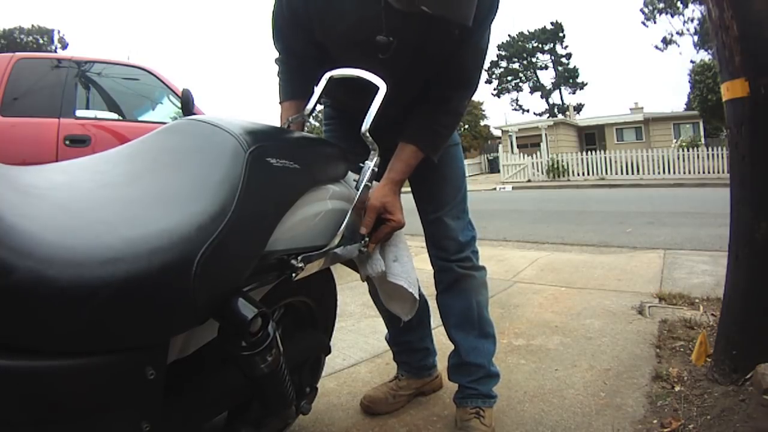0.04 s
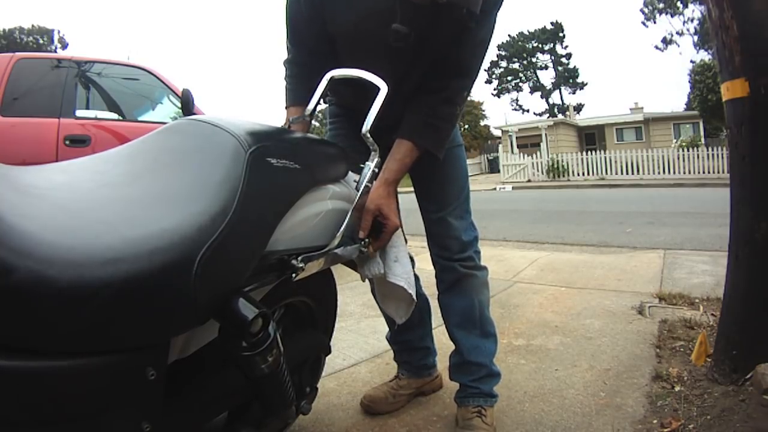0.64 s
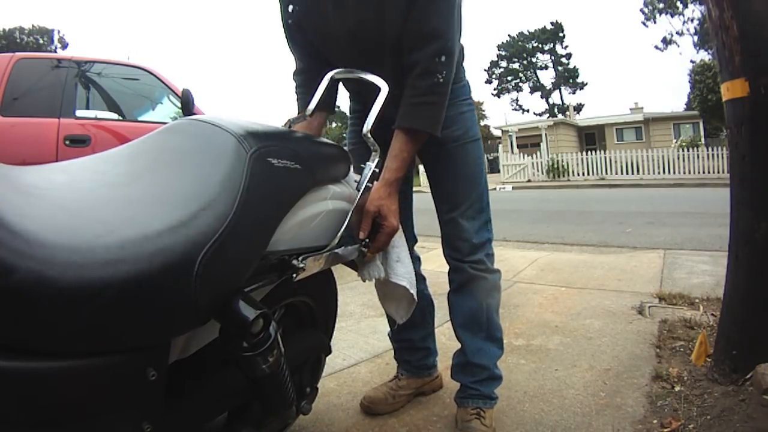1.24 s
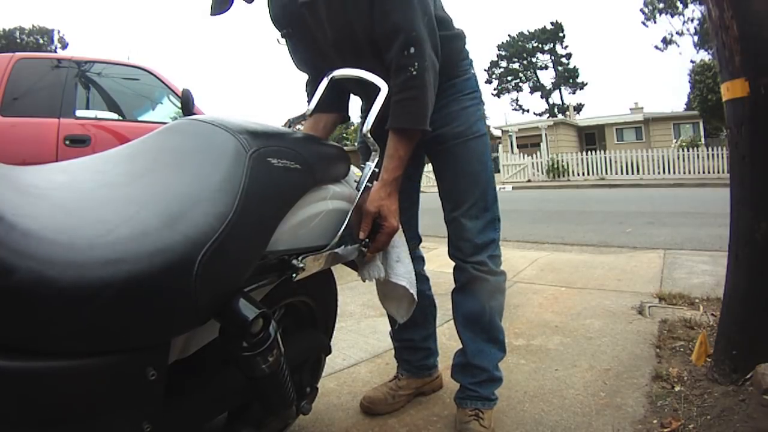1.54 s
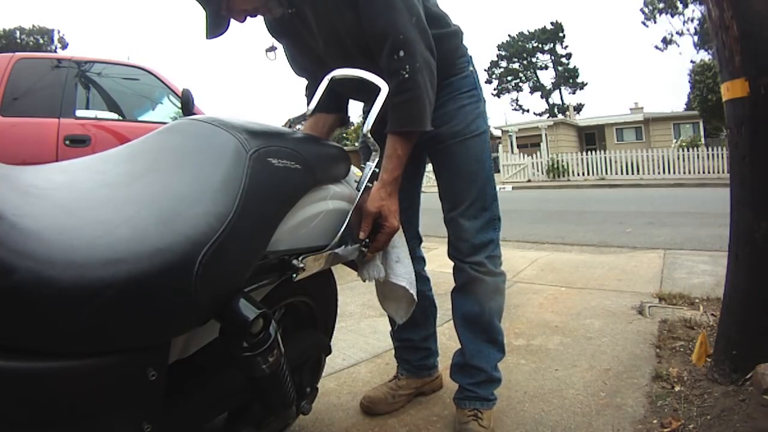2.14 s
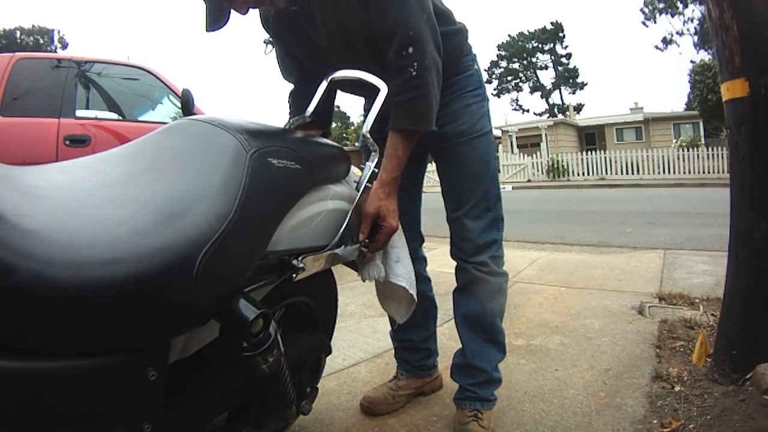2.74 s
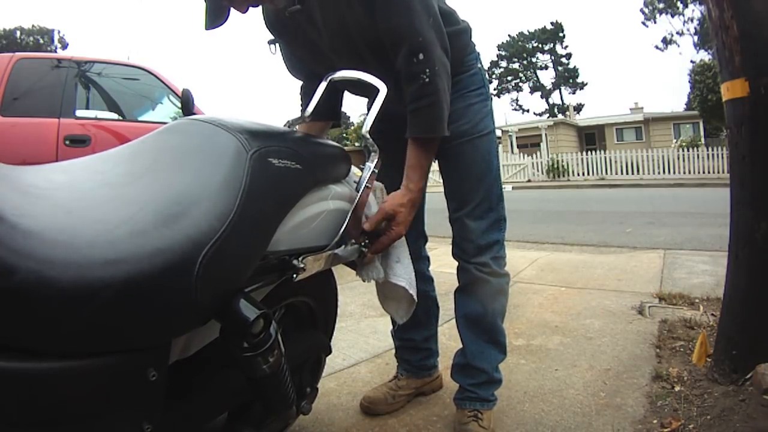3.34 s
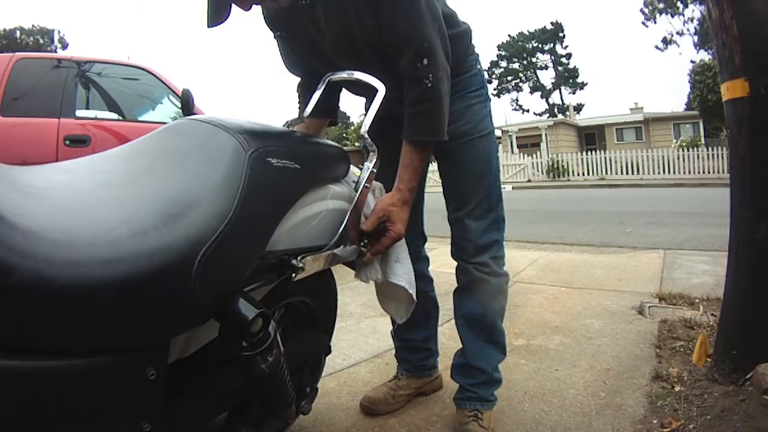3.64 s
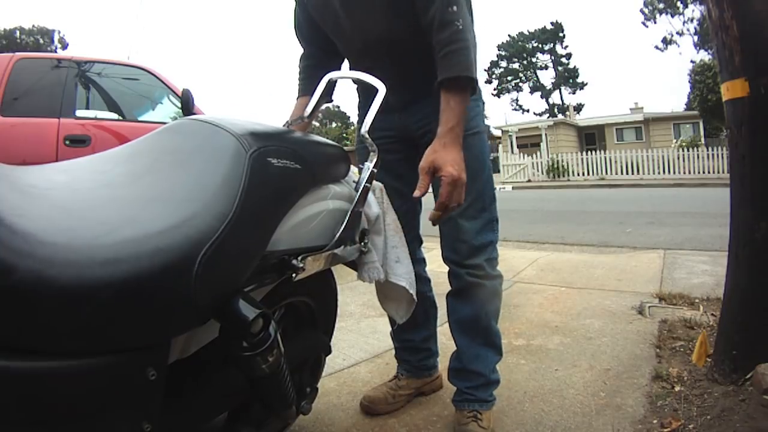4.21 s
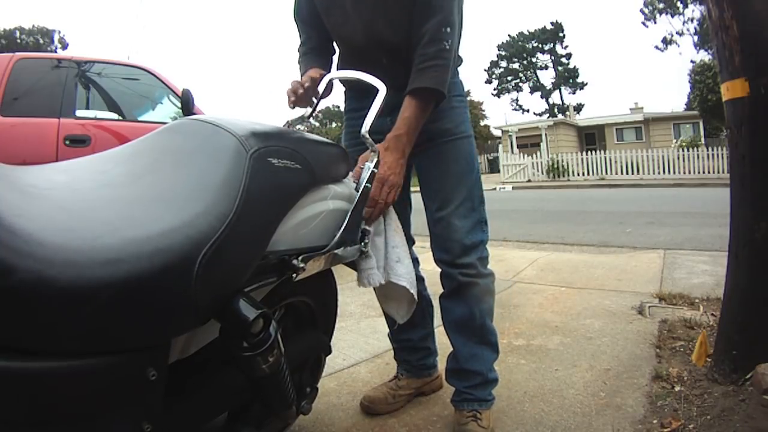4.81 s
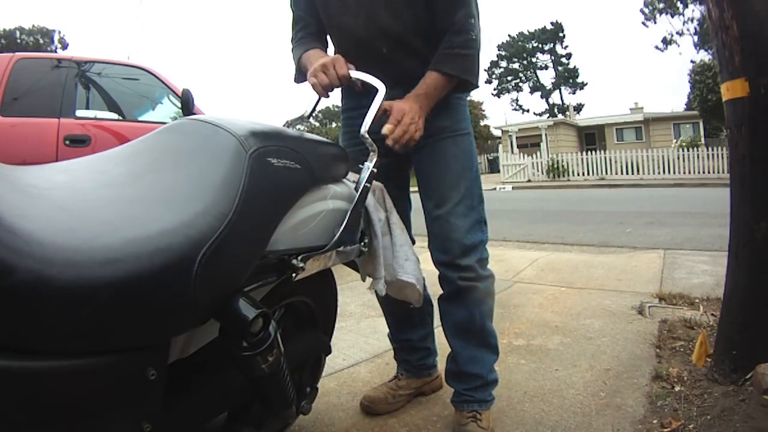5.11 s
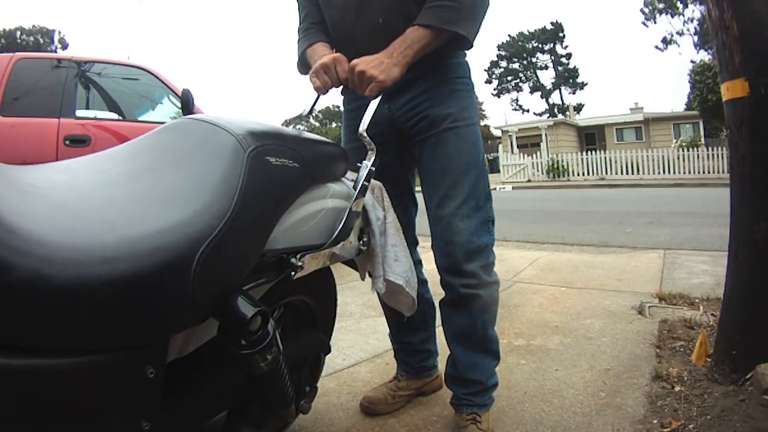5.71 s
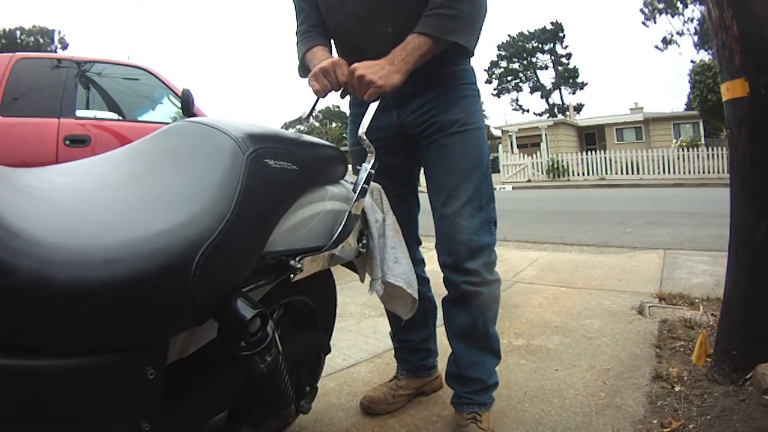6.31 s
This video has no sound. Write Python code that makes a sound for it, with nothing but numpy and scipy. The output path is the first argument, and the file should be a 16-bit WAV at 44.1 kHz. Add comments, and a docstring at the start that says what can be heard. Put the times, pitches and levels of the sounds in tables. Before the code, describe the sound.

A steel luggage rack scrapes briefly along its posts on a motorcycle right at the start, close to the microphone, ending in a small catch. Very faint ticks and clinks follow, with a light latch click at about 2.2 seconds. At 2.8 seconds the rack slams home with a loud clank and a quick rebound, its tube frame ringing briefly. The overall level dips slightly for about three seconds afterwards. At 3.7 seconds the latch snaps shut with a sharp, bright double click, followed by a soft knock at 4.1. From 5.5 to 6.4 seconds the rack is rocked back and forth, making a quick rattle of metal knocks and small chinks, strongest around 6 seconds. Nearby walls give the contacts a short echo. Underneath, throughout, lies a quiet street with soft hiss and the faint low swell of far traffic.

```python
"""Close to the microphone, the arms of a steel luggage rack scrape along a motorcycle's posts.
The rack knocks and slams home, the latch snaps shut, then the rack is rocked to test it.
Every contact rings the same tube frame, and small parts chink. Nearby walls echo; behind them lies
a quiet street with far traffic. The first overload turns the recorder down for about three seconds."""
import sys
import numpy as np
from scipy import signal
from scipy.fft import next_fast_len
from scipy.io import wavfile
from scipy.ndimage import uniform_filter1d

SR = 44100
rng = np.random.default_rng(int(sys.argv[2]) if len(sys.argv) > 2 else 0)


def digitize_waveform(pressure):
    """Quantize a signal to 16-bit integers and store it at the path in sys.argv[1].

    Rows of a 2-D input are taken as channels; values are limited to [-1, 1].
    """
    field = np.atleast_2d(pressure).T
    bounded = np.clip(field, -1, 1)
    quanta = np.round(bounded * 32767).astype(np.int16)
    wavfile.write(sys.argv[1], SR, quanta)


N = 289251

# distant street and microphone hiss: f/Hz, density/dB
STREET_SPECTRUM = [(15, -43.5), (25, -19.5), (91, -1.5), (246, -7.5), (378, -7), (552, -9.5), (614, -8),
                   (997, -10), (1110, -11.5), (1200, -13.5), (1410, -14), (2120, -17.5), (7500, -26),
                   (14300, -28.5), (15500, -29.5)]
# far vehicles: loudest at t/s, level/dB, f/Hz, time to half amplitude/s
VEHICLES = [(.2, -74, 91, .9), (2.6, -65, 88.9, 0.33), (4.1, -61, 102, .3), (6.3, -74.5, 97.6, 0.65)]
# echo of the nearby walls: f/Hz, t60/s
WALL_T60 = [(100, .55), (450, 1), (1000, 0.5), (2000, .45), (6000, 0.29), (12000, .22)]
# faint clinks of small parts as the rack is handled: t/s, level/dB, f/Hz
CLINKS = [(.675, -64, 1430), (1.486, -61.5, 1320), (1.858, -59.5, 1130), (2.042, -60.5, 1420),
          (5.59, -47, 1520), (6.425, -62.5, 6350)]
# modes of the latch plate, shaken at each stop: f/Hz, level/dB
PLATE_MODES = [(5100, -3), (5850, -6), (6550, -5)]
# clear modes of the tube frame: f/Hz, t60/s, knocked/dB, latched/dB, rocked or sliding/dB
FRAME_MODES = [(264, 0.79, -27.5, -34, -31.5), (312, 0.54, -26.5, -28, -32), (331.9, 0.4, -22.5, -22, -23),
               (405.4, 0.3, -26.5, -28.5, -26.5), (443, 0.14, -23, -23.5, -22.5),
               (474.6, 0.29, -24.5, -23, -19.5), (605, 0.12, -29, -22, -22.5),
               (675.5, 0.16, -23.5, -28, -19.5), (784, 0.078, -29, -23.5, -19),
               (821, 0.71, -30.5, -34, -31.5), (947, 0.22, -30.5, -26.5, -19),
               (972, 0.38, -25.5, -21, -22.5), (1045, 0.075, -17, -29, -24), (1076, 0.19, -25, -28, -29),
               (1134.4, 0.18, -34, -30.5, -32), (1242, .19, -25.5, -25, -26), (1333, 0.12, -23.5, -26, -24),
               (1386, .16, -28, -28, -44), (1467, 0.13, -26.5, -34.5, -20.5), (1520, 0.23, -22, -23.5, -27),
               (1630, .18, -24.5, -26.5, -32), (1688, 0.28, -30.5, -28.5, -31),
               (1750, 0.4, -38, -28.5, -30), (1803, 0.078, -29, -30, -34), (1940, 0.18, -25, -21, -22.5),
               (2125, .2, -26.5, -23, -23.5), (2234, 0.14, -23, -22, -22), (2445, 0.12, -25.5, -17.5, -36),
               (2570, 0.1602, -26.5, -26.5, -24), (2944, 0.16, -25, -29, -24),
               (3141, 0.086, -28.5, -25.5, -19), (5078, .08, -24.5, -27.5, -26),
               (7100, 0.078, -22.5, -14, -26)]
KNOCKED, LATCHED, RUBBED = 2, 3, 4  # its level columns
# crowded, damped modes of rack and bike: f/Hz, t60/s
CLATTER_T60 = [(100, 0.061), (400, 0.098), (1200, 0.12), (2400, .1), (4000, 0.057), (7000, .05),
               (14000, 0.037)]
# colour of each kind of contact at the microphone: f/Hz, gain/dB
SLIDE_COLOUR = [(70, -42), (200, -21.5), (310, -7), (460, -2), (560, -14.5), (700, -9), (1000, -11),
                (1500, -13), (1900, -18.5), (2300, -14.5), (3500, -23), (6000, -32), (9500, -48.5),
                (15500, -64)]
KNOCK_COLOUR = [(40, -40), (90, -27.5), (150, -25.5), (240, -20.5), (330, -9), (450, -4), (580, -10.5),
                (820, -8), (1050, -3.5), (1550, -10), (2300, -13), (3000, -20), (6500, -30), (15500, -62)]
LATCH_COLOUR = [(70, -40), (200, -33.5), (330, -19.5), (440, -8), (550, -14), (780, -11), (1300, -5),
                (2000, -5.5), (2900, -11.5), (5000, -15), (7000, -18.5), (10500, -27.5), (12000, -41.5),
                (15500, -51.5)]
ROCK_COLOUR = [(70, -39), (180, -17), (300, -10), (450, -3.5), (600, -11), (950, -5.5), (1400, -2),
               (2000, -10), (3000, -16.5), (4400, -22.5), (6400, -26.5), (7800, -37), (11000, -49.5),
               (15500, -69)]
# the arms scraping along the posts: t/s, slip level/dB, treble/dB
SCRAPE_CURVE = [(0, -49.5, 2.5), (0.057, -50.5, -26), (.09, -58, -6), (0.107, -39.5, 14), (.145, -43, -9)]
# the arms catching as they slide: t/s, level/dB, bass/dB, treble/dB
SNAGS = [(.021, -46, -5, -1), (.097, -35.5, 4.5, -19), (.111, -35, 5, 3.5), (.130, -27.5, -4, 2.5)]
# single knocks and rebounds on the posts: t/s, level/dB, bass/dB, treble/dB
KNOCKS = [(0.454, -59, 10, -16), (1.108, -51.5, 10, -37), (2.882, -37.5, -4.5, 5.5), (2.903, -26, 1.5, -4),
          (2.938, -43.5, 10, -3), (4.105, -43, 2.5, -14), (5.232, -57.5, 14.5, 5)]
# the latch ticking and snapping shut: t/s, level/dB, bass/dB, treble/dB
LATCH_SNAPS = [(1.42, -59, 8.5, -17), (2.172, -37, 2, -9), (3.36, -62, -4.5, -19.5), (3.637, -39, 7.5, -16),
               (3.660, -39.5, -7.5, -9.5), (3.681, -17, -5.5, 7.5), (3.704, -16.5, -2, -5)]
# the latched rack tapping loosely in its play: t/s, level/dB, bass/dB, chink/dB
TAPS = [(5.483, -38, -6, -49.5), (5.490, -36.5, 10, -67), (5.541, -37, 0, -45), (5.702, -35.5, 3.5, -62)]
# pushes on the front stop: t/s, level/dB, bass/dB, treble/dB, chink/dB, pin tick's lead/s, tick/dB
PUSHES = [(5.662, -31, 1, -9, -36.5, 0.016, -53), (5.889, -23, -1.5, 3, -36, 0.011, -43.5),
          (6.107, -23, -3.5, 2.5, -33.5, 0.011, -42.5), (6.357, -31, -2, 0.5, -45.5, 0.021, -43.5)]
# pulls back through the play: t/s, level/dB, drag/s, chink/dB
PULLS = [(5.753, -33, .023, -48), (5.968, -32, .020, -47.5), (6.185, -35.5, .023, -45)]


def amp(db):
    """Decibels to gain."""
    return 10 ** (np.asarray(db) / 20)


def unit_rms(x):
    """Scales to rms 1."""
    return x / np.sqrt(np.mean(x ** 2) + 1e-20)


def curve_at(points, hz):
    """Reads a table along a logarithmic frequency axis."""
    f, value = np.transpose(points)
    return np.interp(np.log(hz + 1), np.log(f + 1), value)


def add(mix, s, sound):
    """Mixes a sound in at time s."""
    part = mix[max(round(s * SR), 0):][:len(sound)]
    part += sound[:len(part)]


def coloured(x, points):
    """Filters by a curve of f/Hz, gain/dB, with minimum phase so that attacks stay sharp."""
    size = next_fast_len(len(x) + SR // 10)
    log_gain = np.log(amp(curve_at(points, abs(np.fft.fftfreq(size, 1 / SR)))))
    response = np.exp(np.conj(signal.hilbert(log_gain)))
    return np.fft.ifft(np.fft.fft(x, size) * response).real[:len(x)]


def dying_noise(t60s, size):
    """Noise whose bands hold equal energy and die at their own speeds; total energy 1."""
    hz, t, bands = signal.stft(rng.standard_normal(size), SR, nperseg=128)
    t60 = curve_at(t60s, hz)[:, None]
    fading = bands * np.exp(-np.log(1000) * t / t60) / np.sqrt(t60)
    tail = signal.istft(fading, SR)[1][:size]
    return tail / np.linalg.norm(tail)


def street(level_db=-61, waver_db=0.67, split_hz=2000):
    """Steady microphone hiss above the distant wash of the street, which wavers slightly."""
    noise = amp(level_db) * unit_rms(coloured(rng.standard_normal(N), STREET_SPECTRUM))
    wash = signal.sosfiltfilt(signal.butter(2, split_hz, fs=SR, output="sos"), noise)
    drift = unit_rms(uniform_filter1d(uniform_filter1d(rng.standard_normal(N), SR // 10), SR // 20))
    return noise + wash * (amp(waver_db * drift) - 1)


def far_traffic(wobble_hz=7):
    """Each vehicle, far off, is a low, unsteady drone that swells and fades."""
    out, t = np.zeros(N), np.arange(N) / SR
    slow = signal.butter(2, wobble_hz, fs=SR, output="sos")
    for s, level_db, hz, half_s in VEHICLES:
        wobble = signal.sosfilt(slow, rng.standard_normal((2, N)))
        phase = 2 * np.pi * hz * t
        drone = unit_rms(wobble[0] * np.cos(phase) + wobble[1] * np.sin(phase))
        swell = 1 / (1 + ((t - s) / half_s) ** 2)
        out += amp(level_db) * swell * drone
    return out


def wall_echo(direct, delay_s=0.017, build_s=.012):
    """Nearby walls return a diffuse echo that reaches the microphone just after the direct sound."""
    t = np.arange(SR) / SR
    build = 1 - np.exp(-np.maximum(t - delay_s, 0) / build_s)
    tail = dying_noise(WALL_T60, SR) * build
    tail = coloured(tail, [(100, 0.5), (400, -2.5), (2000, -7), (5000, -8), (12000, -11)])
    return signal.fftconvolve(direct, tail)[:N]


def chinks(rows, spread, cycles, tail_db=-20, tail_cycles=70):
    """Each small part rings in a cluster of close modes; the higher its pitch, the sooner it dies."""
    out, t = np.zeros(N), np.arange(SR // 5) / SR
    for s, level_db, hz in rows:
        band = signal.butter(3, [hz / (1 + spread), hz * (1 + spread)], "bandpass", fs=SR, output="sos")
        fade = np.exp(-t * hz / cycles) + amp(tail_db) * np.exp(-t * hz / tail_cycles)
        ring = signal.sosfilt(band, rng.standard_normal(len(t)) * fade)
        add(out, s, amp(level_db) * ring / np.std(ring[:SR // 150]))  # level of the attack
    return out


def frame_ring(column, size, scatter_db=2):
    """The tube frame's clear modes; where it is struck decides how strongly each one rings."""
    modes, t = np.array(FRAME_MODES), np.arange(size) / SR
    hz, t60 = modes[:, :1], modes[:, 1:2]
    rings = np.sin(2 * np.pi * (hz * t + rng.random(hz.shape))) * np.exp(-np.log(1000) * t / t60)
    strength = amp(modes[:, column] + scatter_db * rng.standard_normal(len(modes)))
    return strength @ (rings / np.linalg.norm(rings, axis=1, keepdims=True))


def contacts(rows, colour, column, clatter_db, crack_db, crack_s, ring_db):
    """Steel on steel, close up: each contact is a brief crack, a dense clatter and the frame's ring."""
    out, size = np.zeros(N), SR // 2
    t = np.arange(size) / SR
    for s, level_db, bass_db, treble_db, rise_s in rows:
        crack = rng.standard_normal(size) * np.exp(-t / crack_s)
        crack = amp(crack_db) * crack / np.linalg.norm(crack)
        clatter = amp(clatter_db) * dying_noise(CLATTER_T60, size)
        held_db = np.clip((level_db + 60.5) / 2, -7, 0)  # under a light touch the hands damp the frame
        ring = amp(ring_db + held_db) * frame_ring(column, size)
        attack = 1 - np.exp(-t / max(rise_s, 1 / SR))
        blow = coloured((crack + clatter + ring) * attack, colour)
        blow /= np.std(blow[:SR // 50])  # level of the first 20 ms, ahead of bass and treble
        hardness = [(150, 0.0034), (300, bass_db), (460, bass_db),
                    (800, 0.0025), (2000, 0.0038), (5500, treble_db)]
        add(out, s, amp(level_db) * coloured(blow, hardness))
    return out


def with_rise(rows, firm_rise_s, firm_db=-28.5, doubling_db=16):
    """Gives each contact its attack time: the lighter the touch, the slower it builds."""
    return [(s, level_db, bass_db, treble_db, firm_rise_s * 2 ** ((firm_db - level_db) / doubling_db))
            for s, level_db, bass_db, treble_db in rows]


def scrape(slip_s=.007, jitter=.25, rise_s=0.00057, bass_db=-0.5):
    """Stick and slip: a run of unevenly spaced small contacts, as strong as the arms are pressed."""
    s, level_db, treble_db = np.transpose(SCRAPE_CURVE)
    slips = np.arange(s[0], s[-1], slip_s)
    slips += slip_s * jitter * rng.uniform(-1.014, 1, len(slips))
    return [(t, np.interp(t, s, level_db), bass_db, np.interp(t, s, treble_db), rise_s) for t in slips]


def bounces(s, level_db, bass_db, treble_db, count=3, gap_s=.0095, spread=1.55, loss_db=7):
    """After a push the rack settles in bounces, each later, weaker and duller than the last."""
    return [(s + gap_s * k ** spread, level_db - k * loss_db, bass_db + 4 * k, treble_db - 2 * k)
            for k in range(count)]


def rocking(pin_hz=3540):
    """The latched rack shaken to and fro: returns frame contacts, plate chinks and pin ticks."""
    hits, jolts, ticks = [], [], []  # hits: t/s, level/dB, bass/dB, treble/dB
    for s, level_db, bass_db, chink_db in TAPS:
        hits.append((s, level_db, bass_db, -2.5))
        jolts.append((s, chink_db))
    for s, level_db, bass_db, treble_db, chink_db, lead_s, tick_db in PUSHES:
        hits.append((s - lead_s, tick_db + 2, 1, 2))  # the pin's tick carries into the frame
        hits += bounces(s, level_db, bass_db, treble_db)
        ticks.append((s - lead_s, tick_db, pin_hz))
        jolts.append((s, chink_db))
    for s, level_db, drag_s, chink_db in PULLS:
        hits += [(s, level_db, 0, 0),  # the arms touch,
                 (s + drag_s / 2, level_db - 5, 0, -1),  # drag
                 (s + drag_s, level_db + 0.5, 0, 0)]  # and catch
        jolts.append((s + drag_s, chink_db))
    plate = [(s, chink_db + mode_db, hz) for s, chink_db in jolts for hz, mode_db in PLATE_MODES]
    return hits, plate, ticks


def slam(start_s=2.8, count=5, step_s=.0047, crest_s=.013, crest_db=-16.5, swell_db=11,
         bass_db=1, treble_db=3.5):
    """The rack drops home in a quick volley of contacts that swells and dies away."""
    return [(start_s + t, crest_db - swell_db * (t / crest_s - 1) ** 2, bass_db, treble_db)
            for t in step_s * np.arange(count)]


def scene():
    """One microphone by the motorcycle: the rack in front, walls around it, the street far behind."""
    rocks, plate, ticks = rocking()
    rack = contacts(with_rise(slam() + KNOCKS, firm_rise_s=.0009), KNOCK_COLOUR, KNOCKED,
                    clatter_db=-1.5, crack_db=0.5, crack_s=0.0037, ring_db=-1.5)
    rack += contacts(with_rise(LATCH_SNAPS, firm_rise_s=.0018), LATCH_COLOUR, LATCHED,
                     clatter_db=1.5, crack_db=-5, crack_s=0.0031, ring_db=-1.5)
    rack += contacts(with_rise(rocks, firm_rise_s=0.00093), ROCK_COLOUR, RUBBED,
                     clatter_db=2.5, crack_db=-2, crack_s=0.0024, ring_db=1)
    rack += chinks(plate, spread=.05, cycles=18) + chinks(ticks + CLINKS, spread=.15, cycles=24)
    rack += contacts(with_rise(SNAGS, firm_rise_s=0.00087) + scrape(), SLIDE_COLOUR, RUBBED,
                     clatter_db=4, crack_db=1, crack_s=0.0021, ring_db=-.5)
    return (rack + amp(-14) * wall_echo(rack) + street() + far_traffic())[None]


def record(dry, overload_db=-18, duck_db=-5, lag_s=0.091, release_s=2.94, edge_hz=15400):
    """The recorder's gain steps down just after the first overload, holds and returns; then a low-pass."""
    overload = uniform_filter1d(dry[0] ** 2, SR // 100) > amp(overload_db) ** 2
    since_s = (np.arange(N) - np.argmax(overload)) / SR
    ducked = overload.any() & (since_s > lag_s) & (since_s < release_s)
    gain = amp(duck_db * uniform_filter1d(ducked * 1., SR // 50))
    lowpass = signal.firwin(511, edge_hz, window=("kaiser", 9), fs=SR)
    return signal.oaconvolve(dry * gain, lowpass[None], "same")


dry = scene()
out = record(dry)
digitize_waveform(out)
```